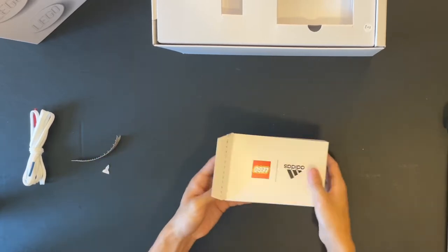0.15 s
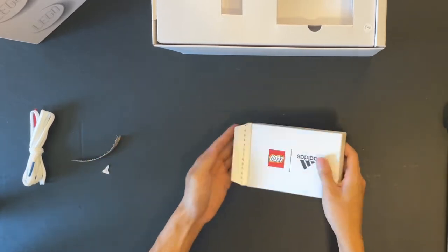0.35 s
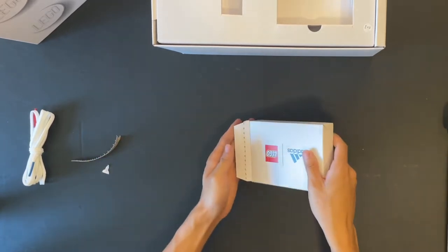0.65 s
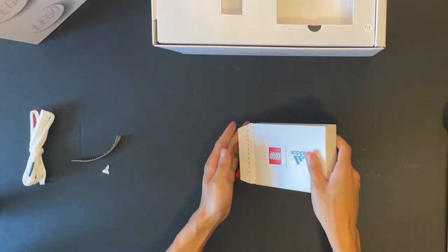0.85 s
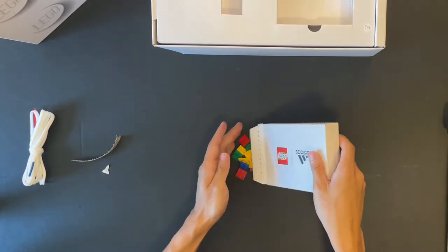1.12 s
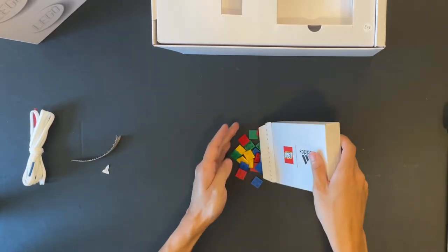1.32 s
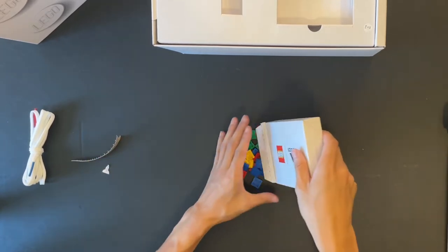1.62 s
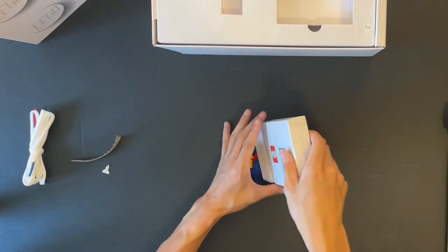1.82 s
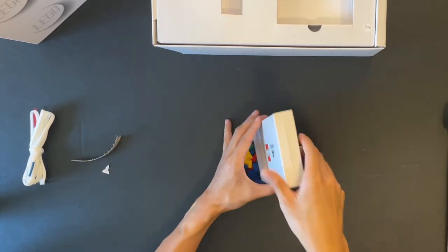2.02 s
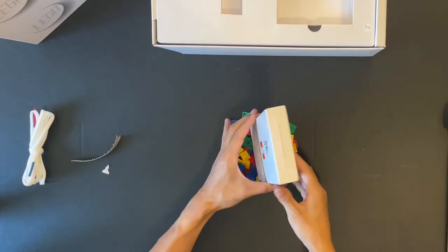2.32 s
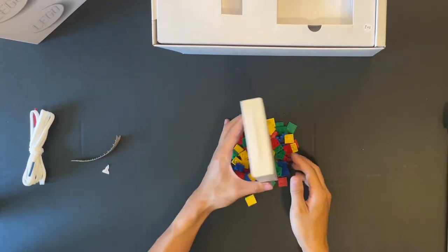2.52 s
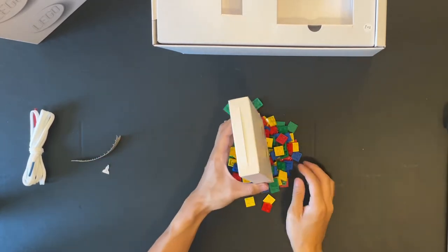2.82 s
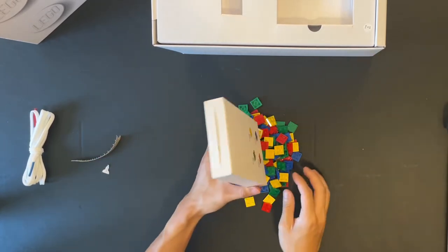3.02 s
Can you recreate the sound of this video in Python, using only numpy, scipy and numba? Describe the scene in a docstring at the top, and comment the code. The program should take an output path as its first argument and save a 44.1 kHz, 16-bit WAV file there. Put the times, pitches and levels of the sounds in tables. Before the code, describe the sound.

Many small hollow plastic bricks slide and rattle in a cardboard box, then pour onto a tabletop, clattering brightly over each other before abruptly thinning out; close stereo pickup in a small, fairly dry room.

```python
"""Plastic bricks poured from a box

Small plastic bricks slide and rattle inside a cardboard box, then spill out and clatter on a table.
Random collisions set off short dying tones of box, bricks and tabletop, and noisy cracks of plastic.
The loudest knocks and the bright ticks of brick on brick come at listed times, over a faint hush.
The sound is spread over left and right, band by band, with quick echoes and a small room's tail."""
import sys
import numpy as np
from scipy import signal
from scipy.fft import rfft, irfft, next_fast_len
from scipy.io import wavfile
from scipy.ndimage import uniform_filter1d
from numba import njit

SR = 44100
rng = np.random.default_rng(int(sys.argv[2]) if len(sys.argv) > 2 else 0)


def wav_record(signal):
    """Record a signal, one row per channel, as 16-bit PCM in the file named by sys.argv[1]."""
    frames = np.transpose(np.atleast_2d(signal))
    bounded = np.clip(frames, -1, 1)
    # unit amplitude maps onto the largest positive 16-bit level
    quanta = np.round(bounded * 32767).astype(np.int16)
    wavfile.write(sys.argv[1], SR, quanta)


N = 138915

# faint background noise, its colour before HUSH_DB sets the loudness: (frequency [Hz], relative level [dB])
HUSH_COLOUR = [(24, -24), (40, -2), (277, -34), (627, 13), (1390, -13), (1690, 22), (11400, -50),
               (15000, -70)]
HUSH_DB = -64  # average level before the stereo spread

# how the stream of bricks swells and fades, before the layer trims below: (time [s], box rattle [dB],
# brick clatter [dB], brick ring [dB], table knock [dB], table thump [dB])
STREAM_LEVELS = [(0.0, -47.5, -53, -63, -64, -76), (0.05, -54, -63, -79, -57, -68),
                 (0.075, -52.5, -53.5, -82, -52, -76), (0.121, -51.5, -64, -71, -71, -76),
                 (0.138, -35.5, -33, -62, -51, -70), (0.2, -42.5, -45, -55, -52, -78),
                 (0.27, -45.5, -49, -56, -54, -74), (0.3, -48, -45, -59, -52, -76),
                 (0.32, -38.5, -41, -57, -58, -73), (0.41, -39.5, -40.5, -55, -51, -75),
                 (0.43, -36, -35.5, -47, -40.5, -66), (0.53, -34, -34.5, -46, -54, -73),
                 (0.56, -37, -36, -44.5, -43, -78), (0.66, -33.5, -35, -58, -57, -64),
                 (0.67, -38, -40, -49, -63, -74), (0.71, -37, -39, -42, -41, -81),
                 (0.81, -36, -38, -50, -52, -47), (0.88, -42, -45, -53, -52, -68),
                 (0.9, -42.5, -48, -63, -46.5, -53), (1.098, -44.5, -40, -47, -44.5, -47),
                 (1.14, -47, -44, -51.5, -53.5, -82), (1.3, -40, -40.5, -59, -48.5, -53),
                 (1.32, -39, -35.5, -47, -44.5, -72), (1.41, -37, -34.5, -43.5, -42.5, -72),
                 (1.52, -40, -42, -54, -63, -86), (1.55, -39.5, -38, -53, -67, -75),
                 (1.59, -39, -39.5, -63, -59, -68), (1.7, -44.5, -44.5, -57, -56, -60),
                 (1.76, -40.5, -42, -49, -53.5, -69), (1.84, -45.5, -37, -46, -44, -55),
                 (1.89, -44, -39.5, -55, -53, -60), (1.95, -48.5, -40, -37.5, -46, -47),
                 (2.04, -49, -34.5, -35, -45, -56), (2.09, -45.5, -40, -38, -46, -54),
                 (2.16, -45, -35.5, -36, -44, -50), (2.18, -41.5, -35, -34, -36, -45),
                 (2.29, -40, -39, -46, -51.5, -52), (2.34, -45, -40.5, -42, -42.5, -45),
                 (2.42, -48.5, -39, -41, -44.5, -59), (2.58, -51, -35.5, -33, -43, -49),
                 (2.67, -46, -36.5, -32, -44, -47), (2.718, -44, -37, -35.5, -48, -46),
                 (2.77, -53, -46.5, -42.5, -47, -66), (2.83, -56, -42.5, -44, -49.5, -66),
                 (2.99, -51.5, -51.5, -57.5, -50.5, -61), (3.08, -81, -68.5, -77, -67, -83),
                 (3.11, -81, -66, -85, -53.5, -79), (3.15, -82, -76, -77, -79, -66)]
# layer trims [dB], added to the levels above
BOX_DB, CRACK_DB, SHELL_DB, RING_DB, TABLE_DB, THUMP_DB = 5.5, 2.5, -2.5, 3, -2, -1.1
# average collisions per second, shared among the spots
HITS_PER_S, SHELL_PER_S, RING_PER_S, TABLE_PER_S, THUMP_PER_S = 850, 700, 1100, 200, 150
HIT_SCATTER_DB, RING_SCATTER_DB, TABLE_SCATTER_DB = -0.5, 1, 1.5  # how much collision sizes vary
SPOTS = 3  # streams, each with its own collisions and echoes
FLUTTER_DB, FLUTTER_HZ = 1.3, 50  # size and quickness of the surges

# The tones a struck thing rings with; t60 is the time to die away by 60 dB.
# cardboard box walls: (frequency [Hz], relative level [dB], t60 [s])
BOX_TONES = [(515, -3, 0.031), (655, -4, 0.062), (710, -1, 0.011), (797, -4.5, 0.045), (910, -1.1, 0.058),
             (1113, -4.5, 0.028), (1231, -2.5, 0.043), (1390, -27, 0.03), (1536, -3.5, 0.045),
             (1815, -1.5, 0.027), (2247, -1, 0.046), (2590, 1.5, 0.019), (3110, -3.5, 0.014)]
# the air in the box sounds lower as it tips and empties: (time [s], frequency [Hz])
BOX_AIR_PITCH = [(0.8, 1150), (1.5, 943)]
BOX_AIR_DB, BOX_AIR_T60_S = -1.5, 0.06  # level on the scale of the box tones
# walls of the hollow bricks: (frequency [Hz], relative level [dB], t60 [s])
SHELL_TONES = [(2180, 8, 0.0056), (2922, -4.5, 0.03), (3975, -8, 0.04), (5323, -2, 0.029),
               (6320, -5, 0.0098)]
# high ring of the bricks, and a thin hissy band near 15.5 kHz:
# (frequency [Hz], relative level [dB], t60 [s])
BRICK_TONES = [(7300, -8, .004), (8300, -8, .004), (9300, -8, .004), (10400, -11, .004), (10950, -4, .009),
               (11200, 0.5, .014), (11400, -4, .009), (13900, -24, .003), (15350, -8, .012),
               (15600, -7, .012)]
# tabletop: (frequency [Hz], relative level [dB], t60 [s])
TABLE_TONES = [(174.5, -1.5, 0.11), (219, -5, 0.055), (257, 1, 0.12), (298.5, 6.5, 0.096),
               (362, -11, 0.094), (437.7, 3.5, 0.13)]
# deep thump of the table: (frequency [Hz], relative level [dB], t60 [s])
THUMP_TONES = [(63, 0.5, 0.097), (75.6, 0.5, 0.23), (122, -14, 0.091)]
# spread of the random detuning at each blow, as a share of the pitch
BOX_DETUNE, SHELL_DETUNE, BRICK_DETUNE, TABLE_DETUNE = 0.036, 0.0854, 0.0055, 0.068
TONE_SCATTER_DB, KNOCK_SCATTER_DB = 1.5, 2.2  # spread of each tone's strength, in the stream and in knocks
RISE_S = 0.00025  # a tone swells while the contact lasts

# colour of the crack of plastic on plastic: (frequency [Hz], relative level [dB])
CRACK_COLOUR = [(200, -17.5), (1000, -1), (2300, 2.5), (3500, -1), (5300, -2.5), (7000, -1), (10300, -2.5),
                (11700, -10), (12700, -25), (13600, -49), (14700, -1.5), (15500, -35), (20000, 0.5)]
CRACK_S = .0022  # time for a crack to fade to about a third

# single knocks, shares counted from the knock's own level, before the trims below: (time [s], level [dB],
# box share [dB], brick ring share [dB], table share [dB], single tone [Hz], single tone share [dB])
KNOCK_EVENTS = [(0.0056, -37, 14, -39, 0, 716, 17.5), (0.0317, -40, -2, -36, -22, 810, 17),
                (0.041, -48, 4, -38, -17, 1100, 2), (0.0590, -42, 12, -38, -25, 1060, 0),
                (0.066, -31, 1, -38, -25, 1000, 2), (0.126, -37.5, 9.5, -38, -22, 980, 11),
                (0.1318, -14.5, 6, -38, -53, 1220, 0), (0.2214, -24.5, 8, -26, -20, 1140, -12),
                (0.2981, -27, 1, -8, -29, 1200, 2), (0.315, -29.5, 10, -29, -2, 1240, 7),
                (0.4552, -21, 0, -19, -18, 1160, -8), (0.4604, -37, 2, -21, -22, 1170, -1),
                (0.539, -32, 14, -20, -18, 1130, -10), (0.5777, -21, -9, -28, -16, 1100, 5.5),
                (0.7417, -22.5, -5, -4, -11, 1090, -6), (0.8235, -24.5, 2, -9, -19, 1190, -9),
                (0.952, -20, 1, -14, -25, 2190, -4), (1.2107, -21, -22, -12, -15, 1470, -7),
                (1.295, -24, -4, -24, -34, 1440, -0.5), (1.331, -33, -13, -17, -22, 1315, 5),
                (1.451, -28, -7, -29, -20, 2310, -7), (1.507, -19, 1, -19, -37, 920, -10),
                (1.5305, -25, -7, -13, -30, 900, 2), (1.5647, -34, 11, -24, -34, 930, -4),
                (1.5865, -27, -5, -22, -27, 810, 2), (1.614, -34, -1, -14, -5, 950, 11),
                (1.6399, -18.5, -2, -24, -16, 2750, 2), (1.6449, -26.5, 6.5, -20, -15, 1420, 3.5),
                (1.6645, -29, -3, -11, -16, 1000, -10), (1.6813, -19.5, -4, -18, -21, 2310, -6),
                (1.733, -23, -3, -17, -26, 1260, -17), (1.8295, -26, 8.5, -18, -12, 970, -22),
                (1.9399, -28.5, 9.5, -7, 2.5, 1060, -21), (1.9966, -32, -22, -3, -22, 5690, -3),
                (2.0487, -27, -10, -8, -32, 1760, 7), (2.1339, -15.5, -15, -19, -27, 5140, -7),
                (2.171, -30.5, -16, -26, -18, 940, 9.5), (2.199, -26, -20, -17, -8.5, 950, 5),
                (2.2882, -38, -12, -18, -5, 935, -1), (2.5537, -18, -11, -5, -14, 936, 1.5),
                (2.6175, -25, -15, 3, -19, 6650, 16.5), (2.665, -21, -13, -12, -22, 1950, 5),
                (2.7366, -36, -8, -2, -15, 456, 6.5), (2.8043, -22, -24, -9, -30, 5950, 8.5),
                (2.8946, -21, -4, -7, -16, 926, -1.5), (2.9373, -24.5, -4.5, -12, -24, 2250, -12),
                (2.952, -37, -12, -21, -10, 880, 12), (2.968, -35, -7, -21, -19, 885, 3.5),
                (3.036, -35, -6, -26, -23, 806, -3), (3.0953, -40.5, -7, -34, -9, 646, -2.5),
                (3.127, -43, -14, -22, -27, 2900, 0)]
KNOCK_DB, KNOCK_BOX_DB, KNOCK_RING_DB, KNOCK_TABLE_DB = -5.5, -12.5, 4.5, -18  # trims
KNOCK_CONTACTS = 4  # the first touch and three weaker ones
KNOCK_BOUNCES_S, KNOCK_BOUNCE_DB = .007, -3  # latest bounce; drop of the earliest, twice this for the latest
TONE_CYCLES = 25  # t60 of a knock's single tone, in cycles
# bright brick-on-brick ticks, before TICK_DB is added: (time [s], level [dB])
TICK_EVENTS = [(1.7763, -22), (1.92, -23), (2.014, -18), (2.1181, -26), (2.131, -31), (2.151, -31),
               (2.189, -44), (2.2572, -15), (2.3591, -16), (2.5566, -10), (2.587, -8), (2.5984, -14),
               (2.606, -1), (2.611, -19), (2.6174, -21), (2.6264, -17), (2.6614, -26), (2.681, -14),
               (2.793, -24), (2.8187, -16), (2.8364, -16), (2.915, -16)]
TICK_DB = -8

# stereo spread by frequency: (frequency [Hz], share of direct sound [0-1],
# phase lead of right over left [half turns], left minus right [dB])
STEREO_BANDS = [(50, .72, -.05, 0), (140, .95, -.12, .9), (300, .88, -.18, 3), (500, .4, -.42, 4.6),
                (1200, .25, -.3, 3), (1550, .2, .3, -1), (2240, .55, .29, 2.5), (2900, .6, -.18, 3),
                (3900, .7, -.04, 3.5), (5000, .68, -.17, 5.5), (5700, .76, 0, 4), (6700, .66, .31, 2.5),
                (7500, .7, .78, .5), (7620, 1, 1, 0), (8750, 1, 1, 0), (8950, .75, 1.17, 0),
                (9500, .7, 1.4, 0), (10300, .7, 1.78, 0), (10500, 1, 2, 0), (13000, 1, 2, 0),
                (13500, 1, 3, 0), (15250, 1, 3, 0), (15500, .96, 3, 0), (22050, .96, 3, 0)]
KNOCK_NEARNESS = .6  # under 1 raises the direct share of the single knocks and the hush
NEAR_T60_S = 0.027  # quick echoes off box, hands and table
ROOM_T60_S, ROOM_DB = 0.2, 0.5  # room tail; its starting level against the quick echoes
BASS_CUT_HZ, TOP_HZ = 79, 15800


def undb(db):
    """Turns decibels into a plain factor."""
    return 10 ** (np.asarray(db) / 20)


def level(x, db):
    """Scales a sound to the given average (RMS) level."""
    return x * undb(db) / np.sqrt(np.mean(x ** 2))


def columns(table):
    """Splits a table into its columns."""
    return np.array(table).T


def colour(x, points):
    """Filters a sound to the given colour, with no sound ahead of its cause."""
    hz, db = columns(points)
    size = 2048
    grid_hz = np.arange(size // 2 + 1) * SR / size
    grid_db = np.interp(np.log(grid_hz + 1), np.log(hz), db)
    # folding the cepstrum forward puts the filter's energy as early as possible
    cepstrum = irfft(np.log(undb(grid_db)))
    cepstrum[1:size // 2] *= 2
    cepstrum[size // 2 + 1:] = 0
    impulse = irfft(np.exp(rfft(cepstrum)))
    return signal.fftconvolve(x, impulse)[:N]


def hush():
    """A faint, steady background of coloured noise."""
    return level(colour(rng.standard_normal(N), HUSH_COLOUR), HUSH_DB)


def walk(rate):
    """Smooth random wander with spread 1: noise averaged twice over a sliding window."""
    window = int(SR / rate)
    once = uniform_filter1d(rng.standard_normal(N), window)
    return level(uniform_filter1d(once, window), 0)


def shower(rate, scatter_db):
    """Random collision times and sizes; a positive scatter makes a few louder, a negative one weaker."""
    draw = rng.random((1000 * N // SR, 2))
    times = np.cumsum(-np.log(1 - draw[:, 0])) / rate
    keep = times < (N - 1) / SR
    extra = np.minimum(-np.log(1 - draw[keep, 1]), 3)
    return times[keep], undb(scatter_db * extra)


@njit
def grains(out, start, gain, turn, fall, rise):
    """Adds one swelling, dying sine per row, stopped once its fade has reached a hundredth."""
    for k in range(len(start)):
        step = fall[k] * np.exp(1j * turn[k])  # each sample turns the spinning value a little and shrinks it
        spin, not_risen, fade = gain[k] + 0j, 1., 1.
        for i in range(start[k], len(out)):
            out[i] += spin.imag * (1 - not_risen)
            spin *= step
            not_risen *= rise[k]
            fade *= fall[k]
            if fade < .01:
                break
    return out


def ring(times, gains, tones, detune, scatter_db=TONE_SCATTER_DB):
    """Every blow strikes each tone with its own strength, sign and slightly different pitch."""
    hz, db, t60 = tones
    chance = rng.standard_normal((len(times), 3, np.shape(db)[-1]))
    sign = np.sign(chance[:, 0])
    strength = undb(db + scatter_db * np.clip(chance[:, 1], -2, 2))
    gain = gains[:, None] * sign * strength
    turn = 2 * np.pi * hz * (1 + detune * chance[:, 2]) / SR  # radians per sample
    start = (times * SR).astype(np.int64)[:, None]
    fall = np.exp(-np.log(1000) / (t60 * SR))
    rise = np.exp(-1 / (RISE_S * SR))
    rows = np.broadcast_arrays(start, gain, turn, fall, rise)
    return grains(np.zeros(N), *(row.ravel() for row in rows))


def box(times, gains):
    """Blows ring the cardboard walls and the air inside, whose pitch drops as the box empties."""
    walls = ring(times, gains, columns(BOX_TONES), BOX_DETUNE)
    air_hz = np.interp(times, *columns(BOX_AIR_PITCH))[:, None]
    air = ring(times, gains, (air_hz, np.array([BOX_AIR_DB]), BOX_AIR_T60_S), BOX_DETUNE)
    return walls + air


def clicks(times, gains):
    """Single-sample pulses of the given sizes."""
    return np.bincount(np.clip((times * SR).astype(int), 0, N - 1), gains, minlength=N)


def crack(times, gains):
    """Each collision is a short, fading burst of noise with the colour of plastic."""
    fall = np.exp(-1 / (CRACK_S * SR))
    power = signal.lfilter([1], [1, -fall ** 2], clicks(times, gains ** 2))  # overlapping bursts add in power
    return colour(np.sqrt(power) * rng.standard_normal(N), CRACK_COLOUR)


def brick_shell(times, gains):
    """Blows ring the thin walls of the hollow bricks."""
    return ring(times, gains, columns(SHELL_TONES), SHELL_DETUNE)


def brick_ring(times, gains, scatter_db=TONE_SCATTER_DB):
    """Blows set off very short, high tones: the ring of the bricks and a thin hissy band above it."""
    return ring(times, gains, columns(BRICK_TONES), BRICK_DETUNE, scatter_db)


def table_knock(times, gains):
    """Blows ring the tabletop in its low tones."""
    return ring(times, gains, columns(TABLE_TONES), TABLE_DETUNE)


def table_thump(times, gains):
    """Blows set off the deepest tones of the table."""
    return ring(times, gains, columns(THUMP_TONES), TABLE_DETUNE)


def pour(flutter_db):
    """The stream of bricks from one spot: six layers of collisions that follow the level table."""
    flow = columns(STREAM_LEVELS)

    def layer(maker, collisions, column, trim_db):
        times, sizes = collisions
        flow_db = np.interp(times, flow[0], flow[column])
        gains = sizes * undb(trim_db + flow_db + flutter_db[(times * SR).astype(int)])
        # the layer's average level follows from the table, whatever its tones
        loudness = np.sqrt(np.sum(gains ** 2) / np.sum(sizes ** 2) / SPOTS)
        return level(maker(times, gains), 0) * loudness

    hits = shower(HITS_PER_S / SPOTS, HIT_SCATTER_DB)  # box and cracks share the same collisions
    mix = layer(box, hits, 1, BOX_DB)
    mix += layer(crack, hits, 2, CRACK_DB)
    mix += layer(brick_shell, shower(SHELL_PER_S / SPOTS, HIT_SCATTER_DB), 2, SHELL_DB)
    mix += layer(brick_ring, shower(RING_PER_S / SPOTS, RING_SCATTER_DB), 3, RING_DB)
    mix += layer(table_knock, shower(TABLE_PER_S / SPOTS, TABLE_SCATTER_DB), 4, TABLE_DB)
    mix += layer(table_thump, shower(THUMP_PER_S / SPOTS, TABLE_SCATTER_DB), 5, THUMP_DB)
    return mix


def knocks():
    """Each knock is a first contact and three weaker ones right after, on box, bricks and table."""
    rows = np.repeat(np.array(KNOCK_EVENTS), KNOCK_CONTACTS, axis=0)
    start, peak_db, box_db, ring_db, table_db = rows[:, :5].T
    tone_hz, tone_db = rows[:, 5:6], rows[:, 6:7]
    bounce = np.arange(len(rows)) % KNOCK_CONTACTS > 0
    later = rng.random(len(rows)) * bounce  # 0 for the first contact, up to 1 for the bounces
    times = start + KNOCK_BOUNCES_S * later
    db = peak_db + KNOCK_DB + KNOCK_BOUNCE_DB * (later > 0) * (1 + later)

    def strike(share_db, tones, detune):
        return ring(times, undb(db + share_db), tones, detune, KNOCK_SCATTER_DB)

    mix = strike(box_db + KNOCK_BOX_DB, columns(BOX_TONES), BOX_DETUNE)
    mix += crack(times, undb(db))
    mix += strike(ring_db + KNOCK_RING_DB, columns(BRICK_TONES), BRICK_DETUNE)
    mix += strike(table_db + KNOCK_TABLE_DB, columns(TABLE_TONES), TABLE_DETUNE)
    mix += strike(0, (tone_hz, tone_db, TONE_CYCLES / tone_hz), BOX_DETUNE)
    return mix


def ticks():
    """Brick hits brick and only the high tones sound."""
    times, db = columns(TICK_EVENTS)
    return brick_ring(times, undb(db + TICK_DB), KNOCK_SCATTER_DB)


def stereo_spread(x, nearness=1):
    """Spreads direct sound over left and right band by band; echoes and room add a different tail to each."""
    size = next_fast_len(N + SR // 2)
    grid_hz = np.arange(size // 2 + 1) * SR / size
    hz, *bands = columns(STEREO_BANDS)
    direct, half_turns, pan_db = (np.interp(grid_hz, hz, values) for values in bands)

    t = np.arange(SR // 2) / SR
    fading = undb(-60 * t / NEAR_T60_S) + undb(ROOM_DB - 60 * t / ROOM_T60_S)
    tails = rng.standard_normal((2, len(t))) * fading
    tails /= np.sqrt(np.sum(tails ** 2, axis=1, keepdims=True))

    share = np.clip(direct, 0, 1) ** nearness
    side = np.array([[-.5], [.5]])  # left, right
    direct_gain = np.sqrt(share) * np.exp(1j * np.pi * side * half_turns)
    echo_gain = np.sqrt(1 - share) * rfft(tails, size)
    spread = rfft(x, size) * (direct_gain + echo_gain) * undb(-side * pan_db)
    return irfft(spread, size)[:, :N]


def scene():
    """The pour from several spots, plus the single knocks, ticks and hush heard more directly."""
    background = hush()
    flutter_db = FLUTTER_DB * walk(FLUTTER_HZ)  # the whole heap surges together
    stream = sum(stereo_spread(pour(flutter_db)) for _ in range(SPOTS))
    return stream + stereo_spread(knocks() + ticks() + background, KNOCK_NEARNESS)


def record(dry):
    """The recorder cuts the deep bass gently and the top steeply."""
    bass_cut = signal.butter(2, BASS_CUT_HZ, "high", fs=SR, output="sos")
    top_cut = signal.ellip(12, .2, 70, TOP_HZ, fs=SR, output="sos")
    return signal.sosfilt(top_cut, signal.sosfilt(bass_cut, dry))


dry = scene()
out = record(dry)
wav_record(out)
```